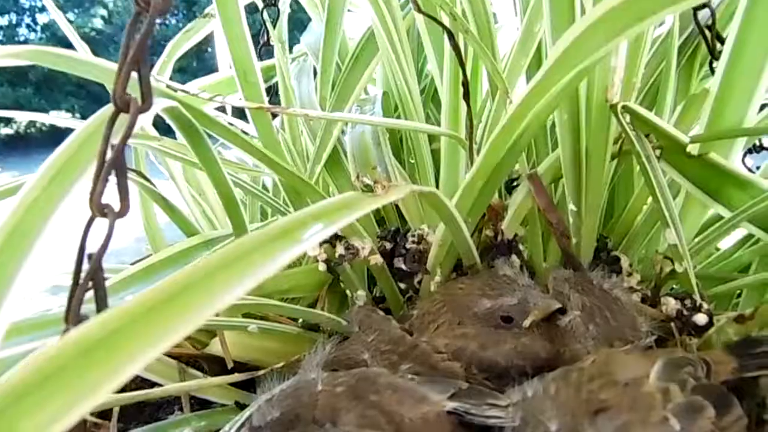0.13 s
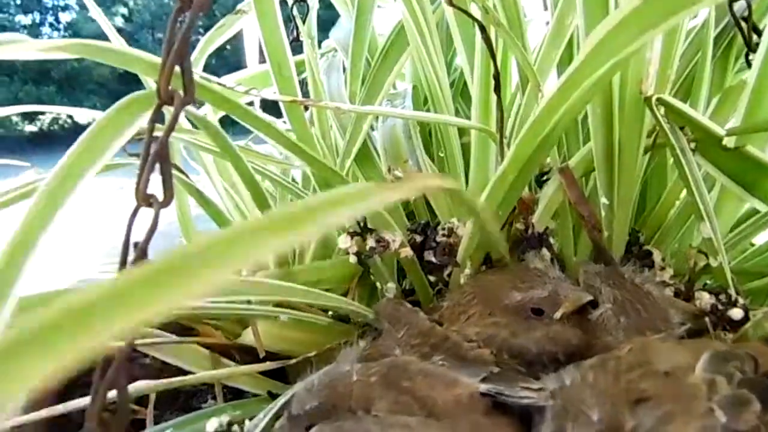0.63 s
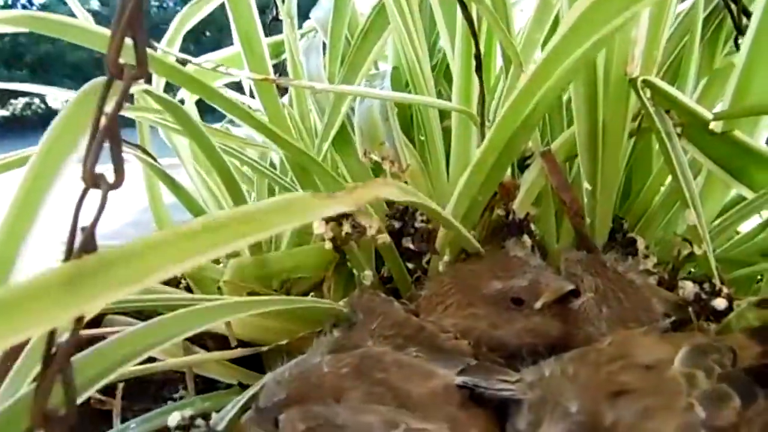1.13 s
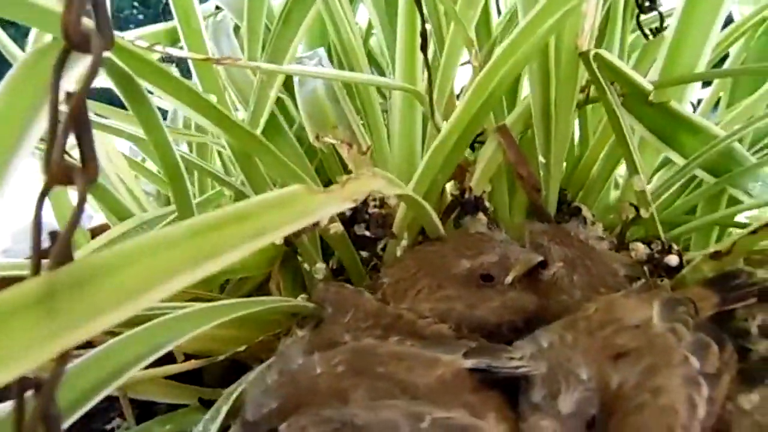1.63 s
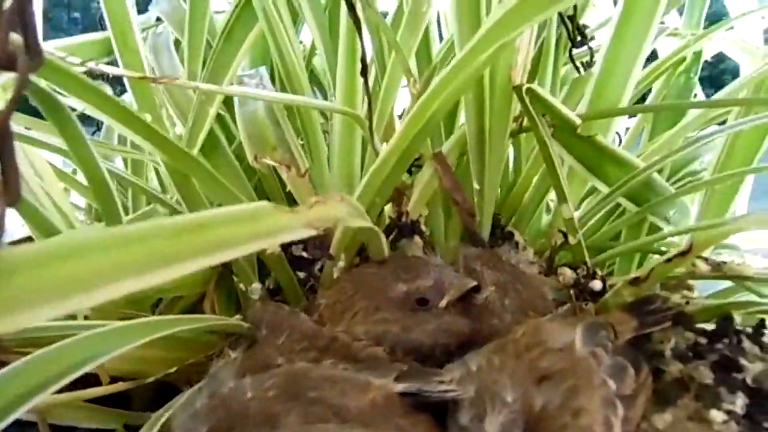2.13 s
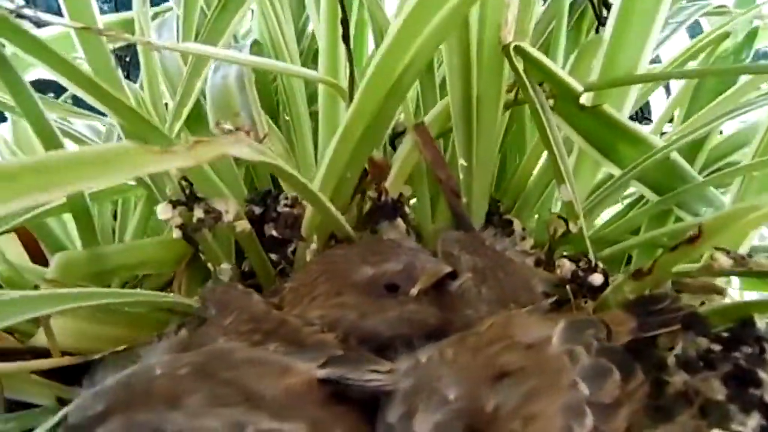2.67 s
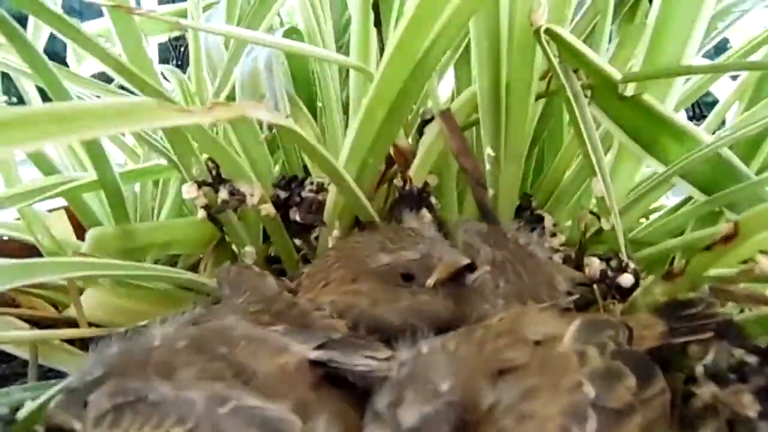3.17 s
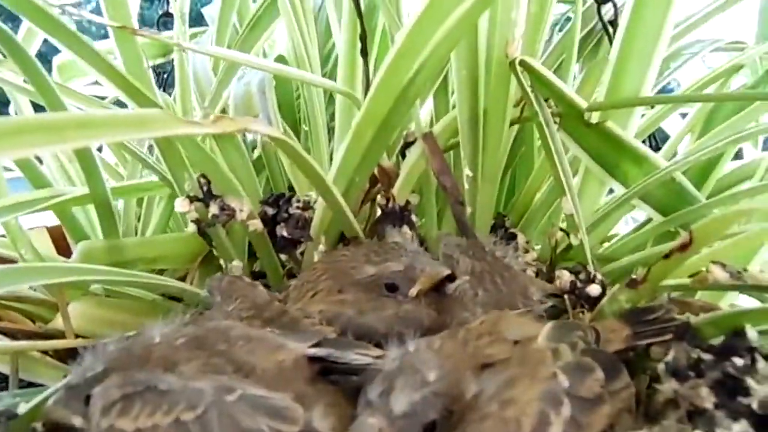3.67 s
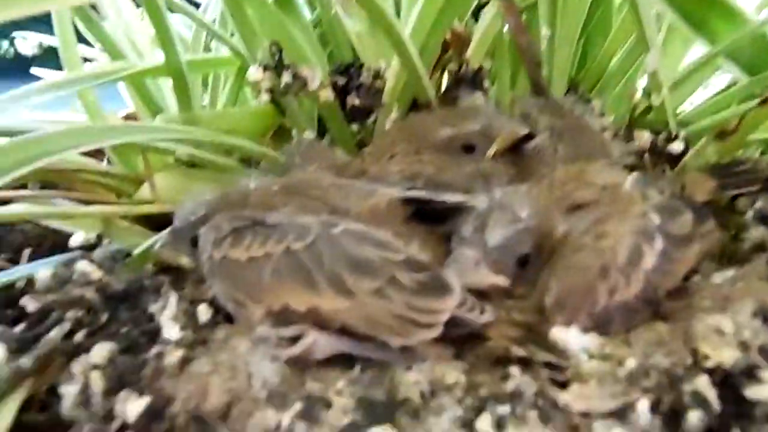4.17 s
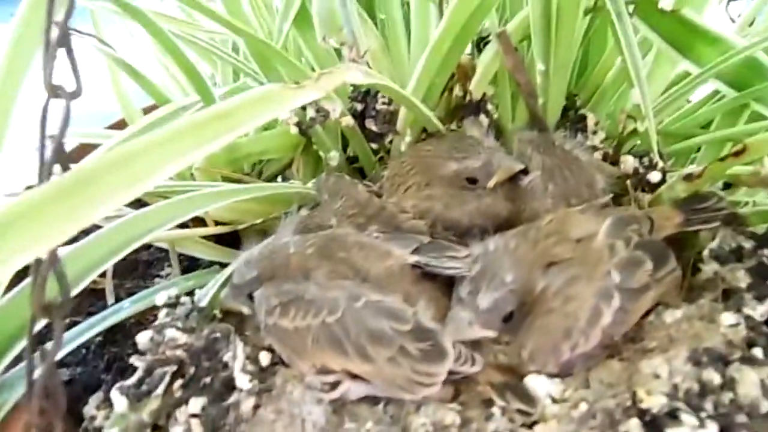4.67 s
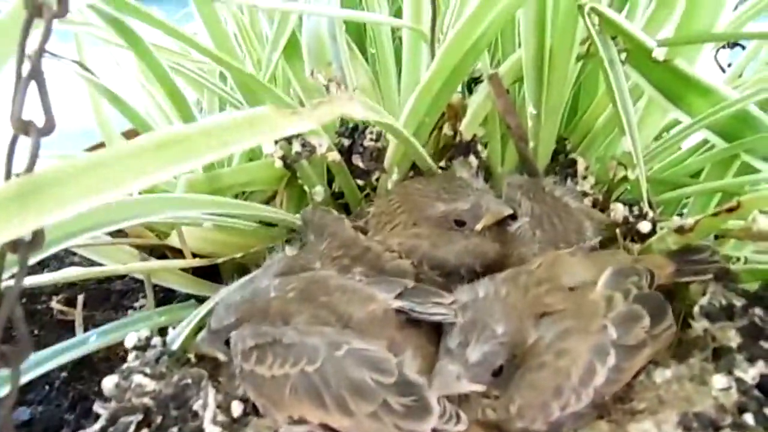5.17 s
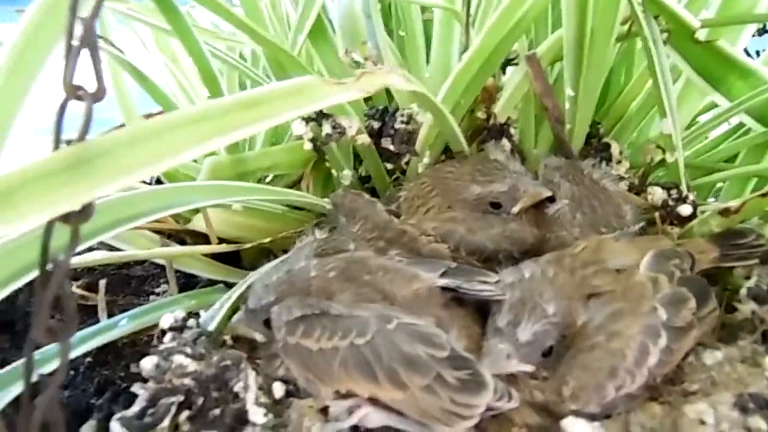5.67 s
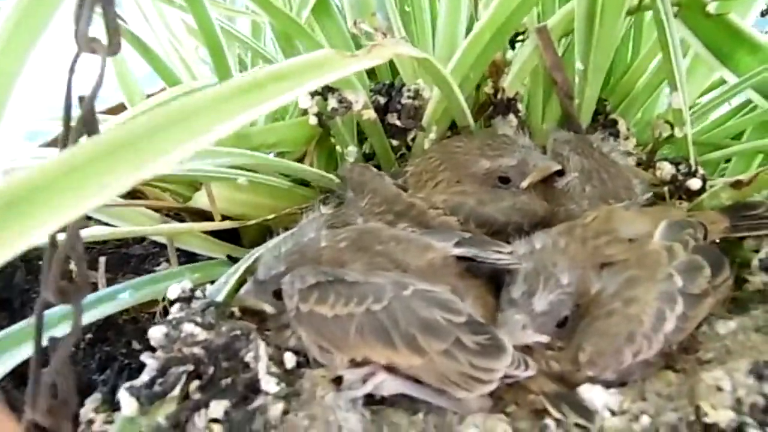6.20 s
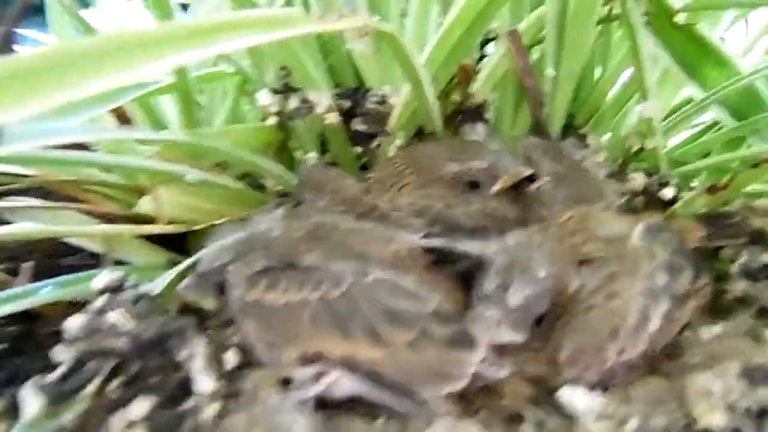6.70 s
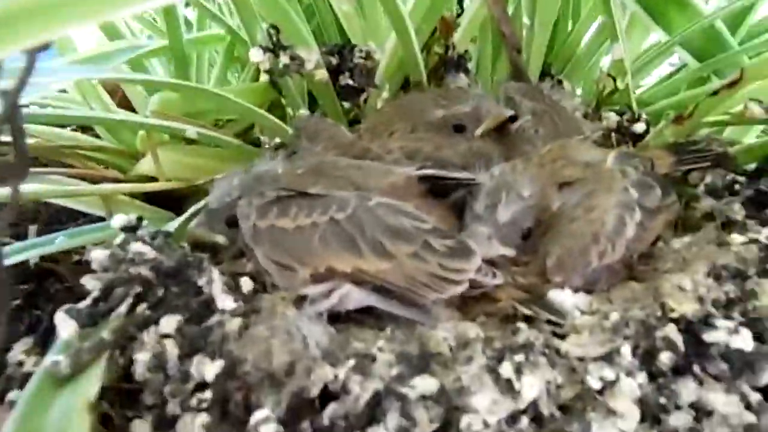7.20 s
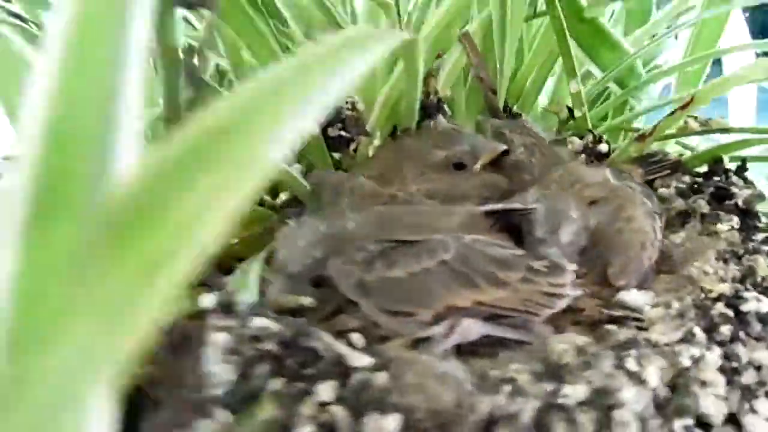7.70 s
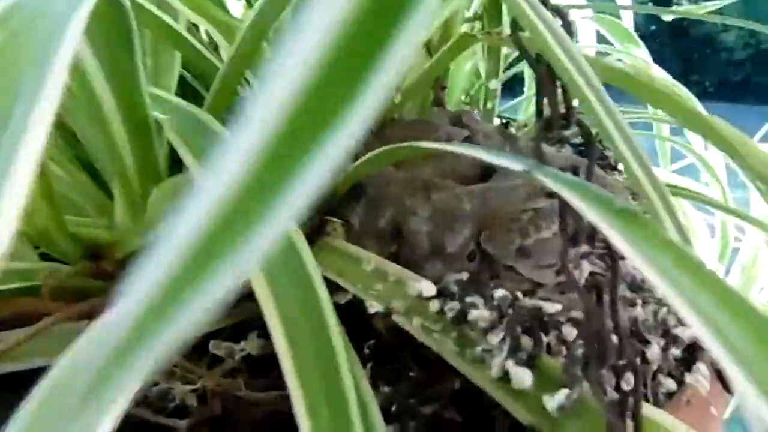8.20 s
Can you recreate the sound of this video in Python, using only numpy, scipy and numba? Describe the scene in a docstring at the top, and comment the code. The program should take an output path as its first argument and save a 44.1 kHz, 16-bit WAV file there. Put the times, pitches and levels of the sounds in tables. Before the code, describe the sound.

A small songbird twice sings five quick, ringing whistled syllables over distant traffic rumble, with leaves rustling and ticking close by.

```python
"""After a blink of near silence, distant traffic rumbles while leaves rustle and a hanging basket ticks close by.
Then a wren some metres off sings two songs of five four-note syllables, made of gliding, nearly pure tones.
Other birds add nasal calls (fluttering stacks of partials) and thin gliding tones; walls and trees echo all birds.
Traffic and leaves are shaped noise; ticks and bumps are short noise bursts sent through resonances."""
import sys
import numpy as np
from scipy import signal
from scipy.fft import rfft, irfft, next_fast_len
from scipy.io import wavfile
from scipy.ndimage import uniform_filter1d
from numba import njit

SR = 44100
rng = np.random.default_rng(int(sys.argv[2]) if len(sys.argv) > 2 else 0)


def amplitude_ratio(level_db):
    """Convert a level in decibels to the matching linear amplitude (field) ratio."""
    exponent = np.asarray(level_db, float) / 20
    return 10 ** exponent


def transcribe(signal):
    """Save signal, clipped to [-1, 1], as a 16-bit WAV file at the path in sys.argv[1]."""
    frames = np.atleast_2d(signal).T
    limited = np.clip(frames, -1, 1)
    pcm = np.round(limited * 32767).astype(np.int16)
    wavfile.write(sys.argv[1], SR, pcm)


N = 367353
TIME = np.arange(N) / SR


def unit(x):
    """Scale to rms 1."""
    return x / np.sqrt(np.mean(x ** 2))


def noise(colour):
    """Noise of rms 1 whose spectrum follows rows of (f/Hz, level/dB)."""
    hz, db = np.transpose(colour)
    size = next_fast_len(N)
    f = np.arange(size // 2 + 1) * SR / size + 1  # the 1 avoids log(0)
    gain = amplitude_ratio(np.interp(np.log(f), np.log(hz), db))
    spectrum = rfft(rng.standard_normal(size)) * gain
    return unit(irfft(spectrum, size)[:N])


def walk(rate):
    """Random wandering: a new value every 1 / rate seconds, smoothed twice; spread near 1."""
    hold = int(SR / rate)
    steps = np.repeat(rng.standard_normal(N // hold + 1), hold)
    smooth = uniform_filter1d(uniform_filter1d(steps, hold), hold)
    return 1.3 * smooth[:N]


@njit
def band(x, hz, width):
    """A resonance: state-variable band-pass filter with gain 1 at its centre; hz and width in Hz."""
    y, b, l = np.empty(len(x)), 0., 0.  # b and l are the band and low-pass memories
    g, k = np.tan(np.pi * hz / SR), width / hz
    for i in range(len(x)):
        v = (b + g * (x[i] - l)) / (1 + g * (g + k))
        b, l, y[i] = 2 * v - b, l + 2 * g * v, k * v
    return y


def hump(t, length):
    """Quick swell and slower fade, peak 1; a longer length (s) stretches both."""
    tau = max(length, .0006) / 1.85  # time of the peak, s
    return t / tau * np.exp(1 - t / tau)


def add(out, note, partials, skip_s=0., fade_s=0.0017):
    """Add one note: partials on a gliding pitch, faded in and out; partials(k, hz) is the gain of partial k."""
    s, *columns = np.transpose(note)
    a, b = int((s[0] + max(skip_s, 0)) * SR), int(s[-1] * SR)
    t = TIME[a:b]
    f, db = (np.interp(t, s, c) for c in columns)
    phase = 2 * np.pi * (np.cumsum(f) / SR + rng.random())
    fade = np.clip(np.minimum(t - t[0], t[-1] - t) / fade_s, 0, 1)
    tone = 0
    for k in range(1, 10):
        audible = k * f < .45 * SR  # leave out partials too high for the sample rate
        tone = tone + partials(k, f) * audible * np.sin(k * phase)
    out[a:b] += tone * fade * amplitude_ratio(db)


# spectrum of the steady traffic, before its overall level is set: (f/Hz, level/dB)
TRAFFIC_COLOUR = [(12, -40), (20, 3.5), (93, -6), (123, -5.5), (210, -19), (301, -16.5), (367, -12),
                  (399, -14.5), (780, -13), (1260, -22), (1400, -20), (1660, -22), (4810, -33), (7520, -32),
                  (16000, -36.5)]
# gusts of wind: (t/s of the middle, level/dB)
GUSTS = [(.84, -51), (1.9, -60), (4.8, -62), (6.32, -56), (7.1, -51), (8.13, -57)]
# level of the engine rumble: (t/s, level/dB)
ENGINE = [(.3, -49.5), (1.4, -50), (1.9, -54), (2.4, -48.5), (3.7, -54.5), (5.2, -53.5), (6.0, -54),
          (7.05, -57.5), (7.7, -54), (8.33, -49.5)]
# nearness of the cars: (t/s, level/dB added to the tyre roar; the drone follows it more strongly)
CARS = [(.3, -3), (2.2, -3.5), (5.0, -3.5), (5.7, -0.7), (6.2, -0.5), (7.9, 2), (8.33, 0.5)]
TRAFFIC_DB, CALM_DB, GUST_S = -49, -62, 0.25
DRONE_DB, DRONE_HZ, DRONE_WIDTH_HZ = -58.5, 516, 123
DRONE_SHARE = 1.6  # dB of drone per dB of nearness
TYRES_DB = -57


def background():
    """Steady traffic, deep gusts, an engine rumble, and the drone and tyre roar of cars, all filtered noise."""
    traffic = noise(TRAFFIC_COLOUR) * amplitude_ratio(TRAFFIC_DB + .6 * walk(1.5))

    gusts = amplitude_ratio(CALM_DB) + sum(amplitude_ratio(db) * np.exp(-((TIME - s) / GUST_S) ** 2) for s, db in GUSTS)
    wind = noise([(12, -1), (22, 6.0), (45, 11), (90, -3.5), (300, -69)]) * gusts

    engine_db = np.interp(TIME, *np.transpose(ENGINE))
    near_db = np.interp(TIME, *np.transpose(CARS))
    passing = [(DRONE_DB + DRONE_SHARE * near_db, DRONE_HZ, DRONE_WIDTH_HZ),
               (engine_db, 75, 110),
               (TYRES_DB + near_db, 1020, 600)]
    white = rng.standard_normal(N)
    swells = np.zeros(N)
    for db, hz, width in passing:
        swells += unit(band(band(white, hz, width), hz, width)) * amplitude_ratio(db)
    return traffic + wind + swells


# how busy the hand is among the leaves: (t/s, level/dB)
RUSTLE = [(.3, -56), (.6, -55), (1.06, -53.5), (1.25, -58), (2.0, -55), (2.4, -55.5), (3.2, -59.5),
          (6.0, -58), (7.16, -54.5), (7.8, -58.5), (8.13, -54), (8.33, -57)]
# spectrum of the dry leaves: (f/Hz, level/dB)
RUSTLE_COLOUR = [(1000, 0.5), (2500, 2.5), (5000, 0), (9000, 1), (13000, -5), (16000, -14)]


def rustle():
    """Dry leaf noise made of uneven grains: fast and slow random changes of level."""
    t, db = np.transpose(RUSTLE)
    uneven_db = 1.8 * walk(150) + 1.4 * walk(30)
    grains = unit(noise(RUSTLE_COLOUR) * amplitude_ratio(uneven_db))
    return grains * amplitude_ratio(np.interp(TIME, t, db))


# soft bumps and hollow hums: (t/s, level/dB, f/Hz, length/s)
BUMPS = [(0.111, -56.5, 297, 0.28), (0.882, -42, 390, 0.021), (0.979, -42.5, 357, 0.02),
         (1.213, -51, 293, 0.021), (2.741, -40.5, 370, 0.016), (2.761, -48, 537, 0.026),
         (4.274, -54.5, 315, 0.1), (6.65, -48, 490, 0.038), (7.708, -49, 1594, .012),
         (8.086, -44, 455, 0.021), (8.2, -45, 474, 0.035)]


def bumps():
    """A soft push rings a hollow body; the longer the push, the narrower the ring."""
    out = np.zeros(N)
    t = TIME[:int(.9 * SR)]
    grains = rng.standard_normal((len(BUMPS), len(t)))
    for (s, db, hz, length), grain in zip(BUMPS, grains):
        width = 5.3 / length  # Hz
        ring = unit(band(band(grain, hz, width), hz, width)) * hump(t, length)
        a = int(s * SR)
        out[a:a + len(t)] += amplitude_ratio(db) * ring[:N - a]
    return out


# touches of leaves and basket, levels before the swell and fade:
# (t/s, leaf level/dB, leaf f/Hz, knock level/dB, length/s)
TICKS = [(.271, -47, 6370, -65, 0.0032), (0.357, -44.5, 8000, -45, 0.0031), (.377, -50, 9500, -58, .0023),
         (0.41, -49, 6800, -63, 0.025), (0.463, -49, 8550, -56, 0.0063), (0.469, -59, 4600, -49, 0.029),
         (.521, -47, 9500, -54, 0.0037), (0.597, -58, 7000, -49, .0046), (.72, -38, 8200, -45, 0.0091),
         (.777, -44, 8300, -62, 0.003), (0.853, -46, 4100, -38, 0.025), (0.953, -39, 7560, -44, .0014),
         (.978, -42, 8750, -62, 0.0036), (.987, -29, 4800, -35, 0.0025), (.998, -42, 4900, -65, 0.0044),
         (1.041, -39.5, 5200, -42, 0.0045), (1.049, -36, 4500, -36, 0.0066), (1.063, -39, 7050, -37, 0.011),
         (1.085, -35.5, 5230, -62, 0.0032), (1.108, -45, 7000, -43.5, .0058),
         (1.212, -40, 5800, -39.5, 0.0048), (1.23, -52, 7600, -50, .0041), (1.982, -49, 9200, -62, .004),
         (2.016, -39.5, 7950, -55, .0048), (2.033, -42, 9430, -62, .002), (2.147, -47.5, 8200, -62, .004),
         (2.194, -46, 7200, -62, 0.0047), (2.506, -40, 4930, -66, 0.0028), (2.595, -50, 8500, -62, .004),
         (2.656, -47, 8200, -62, .005), (2.737, -46.5, 8500, -48, 0.029), (2.833, -51, 8800, -62, .008),
         (2.868, -52, 8600, -60, .0026), (3.083, -39, 8100, -62, 0.0027), (3.22, -40, 7560, -64, 0.0023),
         (4.032, -52, 7860, -60, .0034), (4.971, -51, 8900, -65, 0.053), (5.004, -40, 10600, -62, 0.0022),
         (5.098, -49, 6800, -67, .0033), (5.185, -43, 10000, -62, .0014), (5.38, -47, 8000, -65, .003),
         (5.548, -53, 7200, -65, 0.0033), (6.183, -43, 7750, -52, 0.0068), (6.353, -39, 7800, -64, 0.0015),
         (6.646, -37.5, 5950, -31, 0.0075), (6.651, -46, 6200, -45, 0.035), (6.697, -53, 7450, -45, .0058),
         (7.708, -55, 4480, -56, 0.0036), (7.945, -45, 10700, -68, 0.0045),
         (8.108, -53.5, 9500, -71, 0.036), (8.189, -50.5, 9900, -58, .007), (8.302, -48, 7600, -60, 0.014)]
# resonances of the basket, levels relative to each other: (f/Hz, width/Hz, level/dB)
BASKET = [(1246, 350, 5), (1870, 1000, 3)]
CRACKLE_DB = 3  # spread of the fast level changes
# ring width as a share of the leaf pitch, at most 1; a longer touch rings more leaves
LEAF_WIDTH, LEAF_WIDTH_PER_S = 0.59, 140


def ticks():
    """Each touch is a crackling burst that rings a leaf and knocks the basket."""
    out = np.zeros(N)
    t = TIME[:int(.12 * SR)]
    crackle = amplitude_ratio(CRACKLE_DB * walk(500))
    grains = rng.standard_normal((len(TICKS), len(t)))
    for (s, leaf_db, hz, knock_db, length), grain in zip(TICKS, grains):
        shape = hump(t, length)
        a = int(s * SR)
        burst = grain * shape * np.resize(crackle[a:], len(t))
        width = hz * min(LEAF_WIDTH + LEAF_WIDTH_PER_S * length, 1)
        leaf = band(band(burst, hz, width), hz, width)
        knock = sum(amplitude_ratio(db) * band(burst, f, w) for f, w, db in BASKET)
        touch = amplitude_ratio(leaf_db) * unit(leaf) + amplitude_ratio(knock_db) * unit(knock)
        touch = touch * np.sqrt(np.mean(shape ** 2))  # a short touch carries less energy
        out[a:a + len(t)] += touch[:N - a]
    return out


# single echoes from ground and walls: (delay t/s, level/dB)
ECHOES = [(.004, -14), (.012, -13), (.022, -8), (.035, -15)]
# spectrum of the echo tail from the trees: (f/Hz, level/dB)
TREES_COLOUR = [(1000, 5.5), (2500, -5), (3600, -1), (5500, 3), (6500, -3.5), (11000, 4), (16000, 1)]
TREES_DB, TREES_T60_S = 2.5, 0.43  # strength; time to fade by 60 dB
SMEAR_S = .004  # length of each single echo
FAR_WALL_S, FAR_WALL_DB, FAR_WALL_HZ, FAR_WALL_WIDTH_HZ = .105, -8, 1950, 1500
FAR_WALL_SCATTER_DB = -4  # earlier echoes that also reach the far wall


def garden(x):
    """Echoes only: smeared ones from ground and walls, a dull late one and a diffuse tail from trees."""
    t = TIME[:int(.7 * SR)]
    tail = noise(TREES_COLOUR)[:len(t)] * amplitude_ratio(-60 * t / TREES_T60_S) * np.clip(t / 0.0055, 0, 1)
    response = amplitude_ratio(TREES_DB) * tail / np.sqrt(np.sum(tail ** 2))
    for delay, db in ECHOES:
        rough = unit(rng.standard_normal(int(SMEAR_S * SR)))  # an uneven surface spreads each echo
        response[int(delay * SR):][:len(rough)] += amplitude_ratio(db) * rough / np.sqrt(len(rough))

    near = amplitude_ratio(FAR_WALL_SCATTER_DB) * response
    near[0] = 1  # the direct sound
    dull = band(band(near, FAR_WALL_HZ, FAR_WALL_WIDTH_HZ), FAR_WALL_HZ, FAR_WALL_WIDTH_HZ)
    lag = int(FAR_WALL_S * SR)
    response[lag:] += amplitude_ratio(FAR_WALL_DB) * dull[:-lag]
    return signal.fftconvolve(x, response)[:N]


def call(s, length, first_hz, last_hz, db, bend, peak_at, edge_db, waver=0.):
    """Points of a call: the pitch bends from first to last, the level swells to a peak and fades."""
    u = np.linspace(0, 1, 13)
    places = [0, peak_at, 1]
    hz = first_hz + (last_hz - first_hz) * np.interp(u, places, [0, bend, 1])
    hz = hz * (1 + waver * rng.standard_normal(len(u)))
    level_db = db + np.interp(u, places, [edge_db[0], 0, edge_db[1]])
    return np.transpose([s + length * u, hz, level_db])


# nasal calls, listed two by two, before the pitch wavers: (t/s, length/s, first f/Hz, last f/Hz, level/dB)
NASAL = [(0.437, 0.106, 715, 786, -52), (.59, .05, 740, 716, -58), (1.822, 0.064, 618, 796, -47),
         (1.905, 0.073, 610, 862, -43), (5.342, .12, 609, 740, -48.5), (5.428, 0.078, 545, 733, -50)]
# throat settings, alternating from call to call: (f/Hz, share of the glide done at the peak, peak place 0-1)
NASAL_THROATS = [(3570, .5, .25), (2880, .9, .62)]
# thin gliding tones: whistles, and single strong upper partials of nasal calls:
# (t/s, length/s, first f/Hz, last f/Hz, level/dB)
THIN_TONES = [(3.119, .042, 2190, 2690, -49.5), (3.158, 0.022, 2610, 4100, -51.5),
              (3.85, .028, 2810, 2930, -56), (4.051, 0.018, 4000, 3870, -50.5),
              (4.103, 0.035, 2260, 2420, -50.5), (4.142, .023, 2410, 4570, -45.5),
              (4.69, 0.094, 6800, 7700, -59), (5.322, 0.062, 4320, 5200, -52),
              (5.42, 0.028, 3940, 4700, -46), (7.025, .048, 3150, 4400, -50),
              (7.045, 0.044, 2950, 4100, -44)]
THROAT_WIDTH_HZ, NASAL_FLUTTER_DB = 890, 4.5
NASAL_WAVER = .02  # pitch unsteadiness, share
NASAL_EDGE_DB = (-1.5, -4.5)  # start and end, relative to the peak
# share of the glide done at the peak; place of the peak 0-1; start and end level relative to the peak
THIN_BEND, THIN_PEAK_AT, THIN_EDGE_DB = .78, .55, -5


def other_birds():
    """Buzzy, fluttering stacks of partials through a throat resonance, and thin gliding sine tones."""
    buzz, thin = np.zeros(N), np.zeros(N)
    throats = np.resize(NASAL_THROATS, (len(NASAL), 3))
    for row, (throat, bend, peak_at) in zip(NASAL, throats):
        nasal = call(*row, bend, peak_at, NASAL_EDGE_DB, NASAL_WAVER)
        add(buzz, nasal, lambda k, f: np.exp(-((k * f - throat) / THROAT_WIDTH_HZ) ** 2), fade_s=0.0033)
    for row in THIN_TONES:
        glide = call(*row, THIN_BEND, THIN_PEAK_AT, (THIN_EDGE_DB, THIN_EDGE_DB))
        add(thin, glide, lambda k, f: k == 1)
    return buzz * amplitude_ratio(NASAL_FLUTTER_DB * walk(160)) + thin


# the four notes of a syllable, before stretch, pitch change and effort: (t/s after its start, f/Hz, level/dB)
NOTES = [
    [(.004, 6530, -26), (.009, 6233, -5.5), (.015, 5540, -3), (.022, 4985, -4.5), (.03, 4650, -5),
     (.05, 3900, 0.5), (.064, 3580, 0.5), (.072, 3390, -1)],
    [(.101, 2842, -2), (.112, 3654, 2.5), (.122, 4850, -5.5), (.138, 5034, -4.5), (.148, 5400, -0.5),
     (.158, 5630, -0.5), (.172, 6280, -4.5)],
    [(.213, 2669, -7.5), (.228, 2390, -2), (.243, 2204, -4.5), (.254, 2401, -3), (.264, 2602, 5),
     (.275, 2659, 2.5), (.285, 2627, -6.5), (.296, 2704, -5.5), (.306, 2710, -13)],
    [(.315, 1706, -11), (.33, 1887, -8), (.342, 2206, -5), (.352, 2290, -6), (.36, 2284, 6)],
]
# each note at full effort: (level/dB, share of the syllable's effort it follows)
NOTE_EFFORT = [(-31.5, .99), (-33.5, 0.58), (-34.6, .36), (-34.5, 0.33)]
# syllables: (start t/s, stretch factor, effort level/dB, late start of the first note t/s)
SYLLABLES = [(1.018, 1.03, -12.5, 0.029), (1.414, 1.0, -3.5, .001), (1.807, 0.99, -0.9, 0.00098),
             (2.199, 1.002, -0.2, 0.00093), (2.6, 1.014, -0.6, 0.0012), (5.492, 0.99, -11, 0.015),
             (5.886, 1.001, -4, 0.0011), (6.283, 0.98, -1.8, .001), (6.678, 1.005, -1, 0.0011),
             (7.082, 1.02, -3.5, 0.0015)]
# partials 2 to 5 where the beak carries best: (level/dB)
OVERTONES_DB = [-24, -31, -45, -25]
BEAK_HZ, BEAK_WIDTH_HZ = 11200, 4400


def wren():
    """Nearly pure whistles, one syllable repeated at slightly changing speed, pitch and effort."""
    out = np.zeros(N)
    gains = np.r_[1, amplitude_ratio(np.array(OVERTONES_DB)), np.zeros(4)]

    def partials(k, f):
        """The fundamental is full; faint overtones peak at the beak resonance."""
        if k == 1:
            return 1
        return gains[k - 1] * np.exp(-((k * f - BEAK_HZ) / BEAK_WIDTH_HZ) ** 2)

    chances = rng.standard_normal(len(SYLLABLES))
    for (start, stretch, effort_db, skip), chance in zip(SYLLABLES, chances):
        pitch = 1 + 0.0077 * chance
        for note, (db, share), late in zip(NOTES, NOTE_EFFORT, (skip, 0, 0, 0)):
            sung = np.array(note) * [stretch, pitch, 1] + [start, 0, db + share * effort_db]
            add(out, sung, partials, late)
    return out


NASAL_WET_DB = -3.5  # how strongly the other birds excite the echoes


def scene():
    """Birds in the garden, leaves close by, town behind."""
    song, others = wren(), other_birds()
    birds = song + others + garden(song + amplitude_ratio(NASAL_WET_DB) * others)
    mix = birds + ticks() + bumps() + rustle() + background()
    return mix[None]  # one channel


def band_limit(x):
    """A steep low-pass at the top of the band."""
    return signal.sosfilt(signal.butter(12, 16230, fs=SR, output="sos"), x)


START_S, BEFORE_START_DB, TOP_HZ = 0.11, -58, 15850


def record(dry):
    """The microphone opens after a moment of near silence; a steep low-pass cuts the top."""
    opened = dry * np.where(TIME < START_S, amplitude_ratio(BEFORE_START_DB), 1)
    low_pass = signal.ellip(10, .2, 70, TOP_HZ, fs=SR, output="sos")  # ripple .2 dB, stop 70 dB
    cut = signal.sosfilt(low_pass, opened)
    return band_limit(cut)


dry = scene()
out = record(dry)
transcribe(out)
```